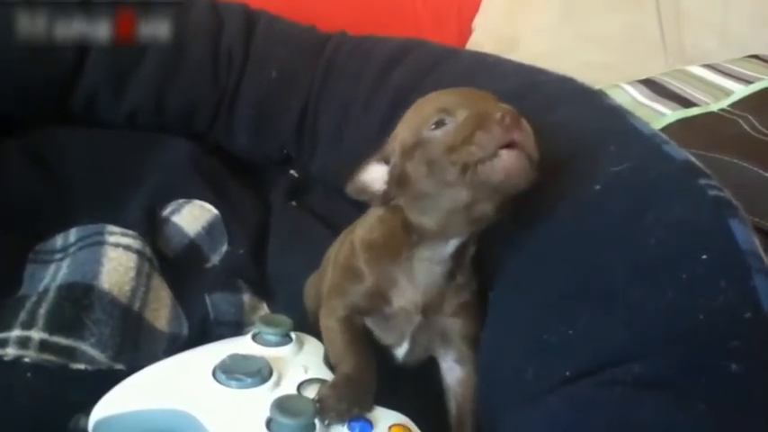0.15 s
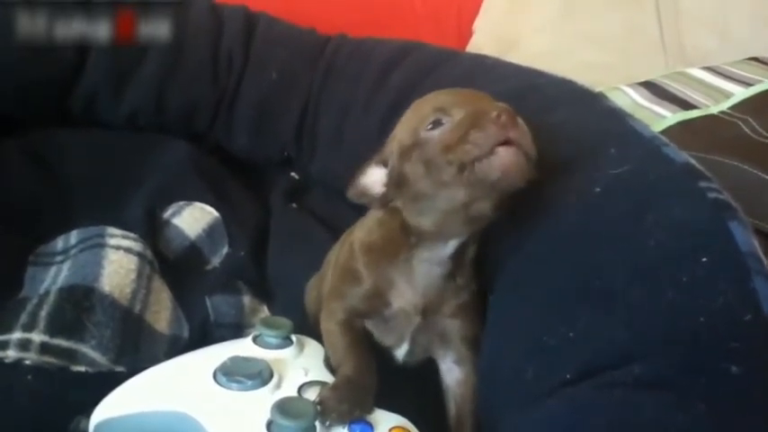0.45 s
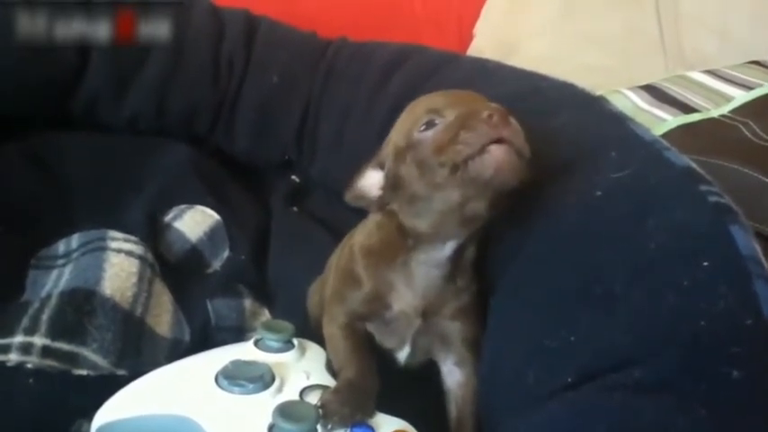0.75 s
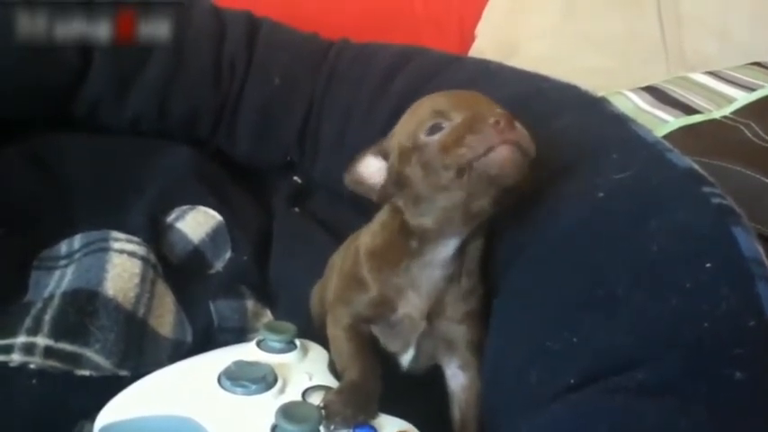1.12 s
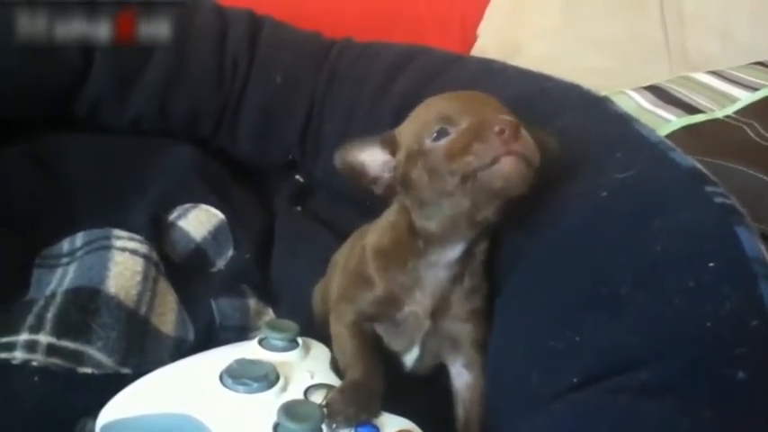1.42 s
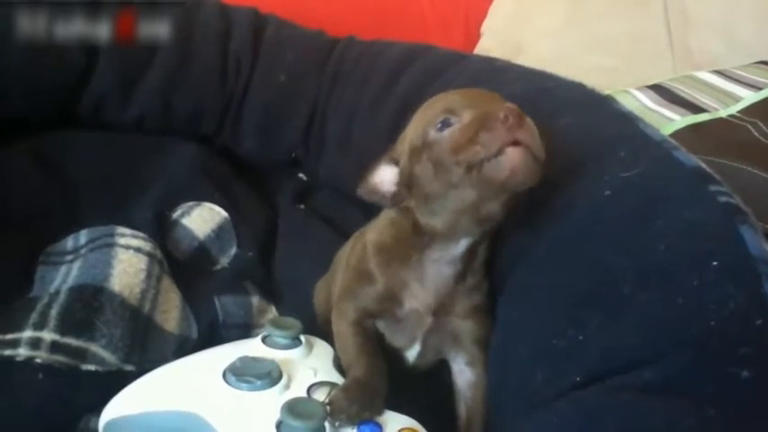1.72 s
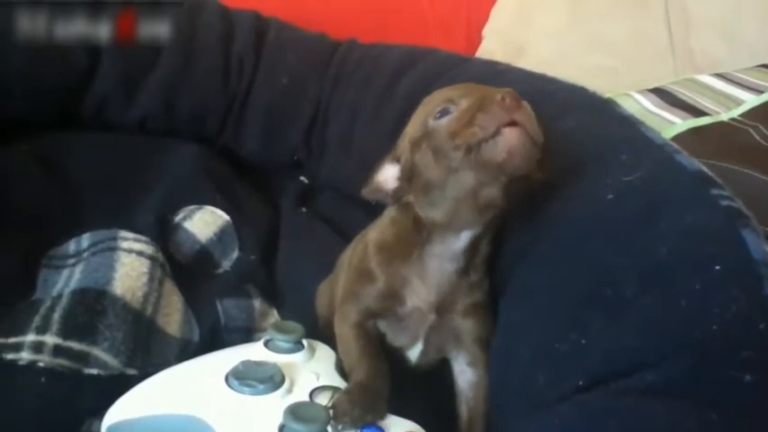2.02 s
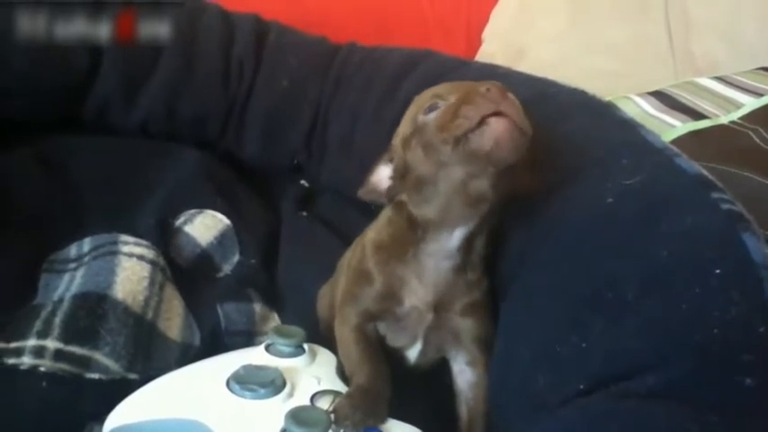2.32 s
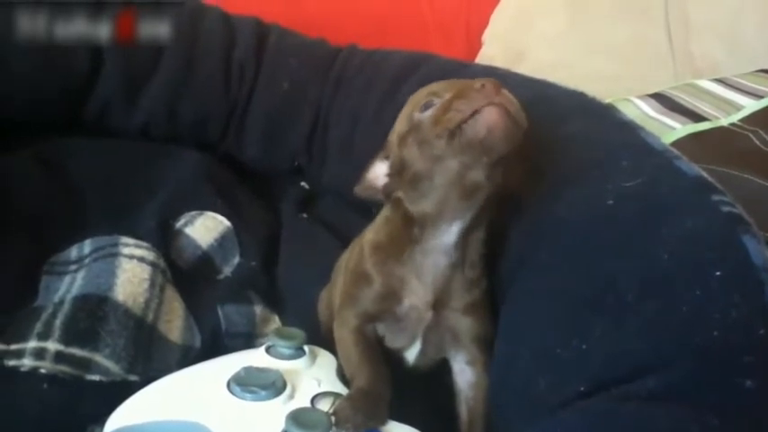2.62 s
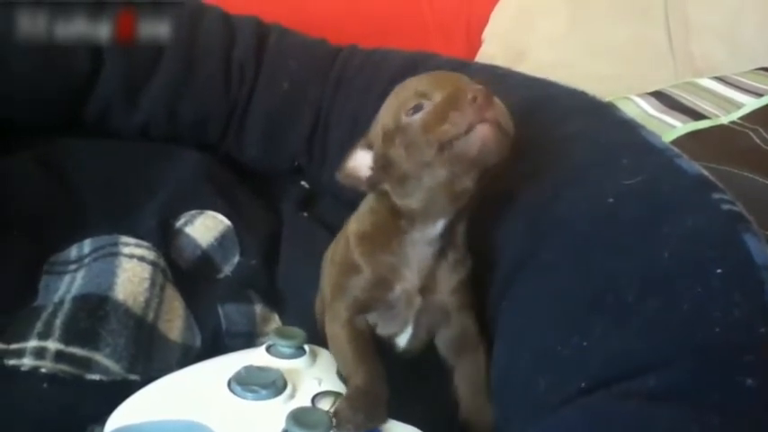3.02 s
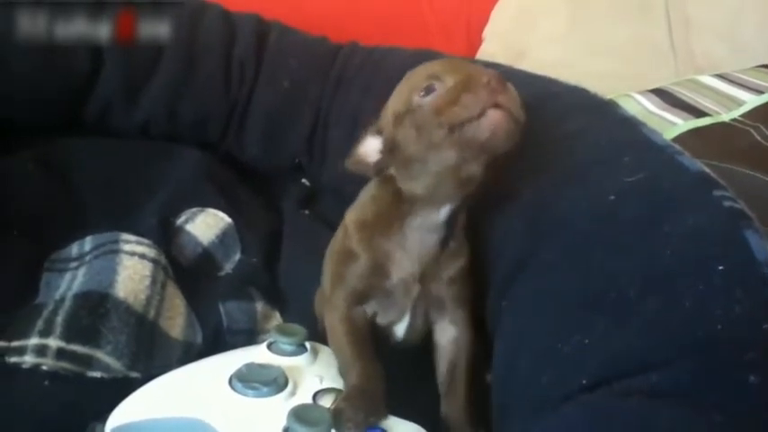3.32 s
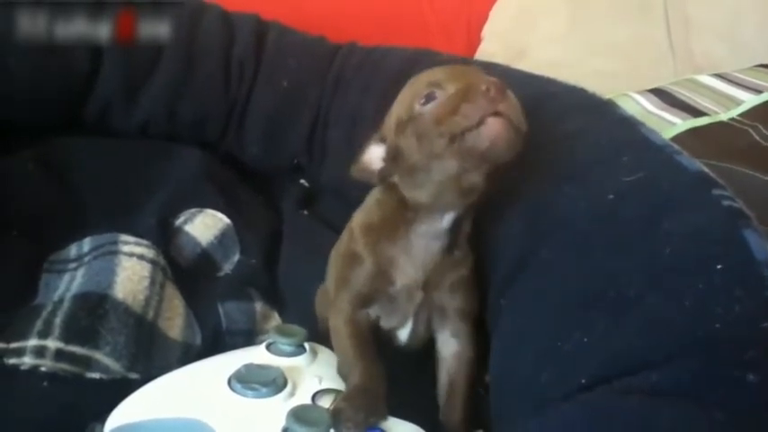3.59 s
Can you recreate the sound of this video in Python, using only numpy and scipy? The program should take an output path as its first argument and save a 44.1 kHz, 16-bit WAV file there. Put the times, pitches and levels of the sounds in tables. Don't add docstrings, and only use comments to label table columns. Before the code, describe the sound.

Puppy howling: cracked whimpers slide up into held clear tones, the last one cut off.

```python
import sys
import numpy as np
from scipy import signal
from scipy.fft import rfft, irfft
from scipy.io import wavfile
from scipy.ndimage import uniform_filter1d

SR = 44100
rng = np.random.default_rng(int(sys.argv[2]) if len(sys.argv) > 2 else 0)


def volts_from_decibels(level):
    exponent = np.asarray(level, float) / 20
    return 10 ** exponent


def unload_wav(signal):
    wavfile.write(
        sys.argv[1],
        SR,
        np.round(np.clip(np.atleast_2d(signal).T, -1, 1) * 32767).astype(np.int16),
    )


N = 165375

# f/Hz, level/dB
FLOOR_COLOUR = [(18, -60), (30, -25), (126, -5.5), (488, -13.5), (721, -18.5), (800, -14.5), (1750, -19.5),
                (2390, -24), (15200, -32)]
FLOOR_DB, FLOOR_SWAY_DB = -45, .5
DUCK_DB = 1
HUM_HZ, HUM_DB = 121, -56
ROOM_DB, ROOM_T60_S, ROOM_TOP_HZ = -24, .26, 2600

# t/s, level/dB, fade/dB per s
SCUFFS = [
    (2.995, -42, -41.5),
    (3.699, -41, 18),
    (3.4, -46, -350),
]
# f/Hz, level/dB
SCUFF_COLOURS = [
    [(200, -8), (900, -2), (2000, -6.5), (3500, -16), (6000, -24), (9000, -37)],
    [(60, -11.5), (150, -2), (300, -7), (600, -41), (2000, -69)],
    [(300, -15), (1500, 1), (6000, -3), (9000, -25.5)],
]

# t/s, length/s, level/dB, fade/dB, rate/pulses per s
CREAKS = [
    (0.957, 0.043, -22.5, -11, 380),
    (2.626, 0.031, -26, -18.5, 260),
    (3.2895, 0.0096, -23.5, -6.5, 410),
    (1.5, .004, -42, -9, 290),
]
# f/Hz, width/Hz, level/dB
CREAK_THROAT = [(800, 180, 6), (1199.4, 290, -4), (1880, 430, -11.5), (490, 190, -15)]
CREAK_HISS = 0.078

# f/Hz, level/dB
BREATH_COLOUR = [(300, -18.5), (1000, -4), (2200, -9), (3000, -29), (6500, -30.5), (8000, -11.5),
                 (12500, -12.5), (15000, -39.5)]
BREATH_DB, BREATH_SWAY_DB = -30.5, 1.2
GLIDE_BREATH_DB = 3

# t/s, length/s, cycles per pattern, in-between partials level/dB, raggedness 0-1
BREAKS = [
    (.006, 0.035, 2, -11, 0.09),
    (0.052, 0.018, 3, -13, 0.06),
    (1.639, .02, 2, -4, 0.07),
    (1.744, 0.026, 2, -7, 0.02),
    (1.76, .014, 3, -1.5, 0.1),
    (2.607, .035, 2, -13, 0.24),
    (3.285, 0.016, 3, 8, 0.15),
    (3.299, .028, 3, -1.5, 0.17),
]
# f/Hz, level/dB
BREAK_COLOUR = [(280, -17), (540, 0), (700, -0.5), (1200, 3), (2000, -4), (2600, -17.5), (3300, -39)]
JITTER_RAD, JITTER_HZ = .14, 350

# t/s, pitch f/Hz, effort level/dB, mouth lift of the fundamental/dB
WHIMPER_1 = [(0.008, 555, -25, 3.5), (0.037, 652, -19, 0), (0.058, 800, -24.5, 7), (0.1, 893, -18, 6),
             (0.129, 969, -19, 4), (0.161, 1008, -19.5, 9)]
WHIMPER_2 = [(1.648, 298.6, -48, 17.5), (1.66, 353, -39, 16.5), (1.688, 425.2, -28, 5.5),
             (1.728, 491, -26.5, 7.5), (1.752, 628, -17.5, -6), (1.764, 807.7, -25.5, 7),
             (1.782, 894.6, -20, 11), (1.82, 960.7, -20.5, 5.5)]
WHIMPER_3 = [(3.292, 773, -37.5, 4), (3.302, 813, -29, 6), (3.314, 879, -25, 11), (3.332, 946, -21.5, 9.5),
             (3.35, 1047, -24.5, 15), (3.362, 1068, -26.5, 14), (3.39, 941, -20, 8), (3.418, 947.4, -21, 5),
             (3.454, 1006, -18.5, 8.5)]
# t/s, pitch f/Hz, effort level/dB, mouth lift of the fundamental/dB
HOLD_1 = [(0.178, 1021, -18, 10), (0.194, 1027, -19.5, 5.5), (0.304, 1065, -17.5, 7.5),
          (0.354, 1047, -18, 6), (0.418, 1049, -17.5, 3.5), (0.474, 1019, -17.5, 6), (0.508, 1011, -18, 6),
          (0.56, 1007, -17.5, 9.5), (0.58, 992, -18.5, 8.5)]
HOLD_2 = [(1.846, 1000, -20.5, 11.5), (1.882, 1060, -19, 7.9), (1.916, 1085, -19, 10.3),
          (1.989, 1100, -18.5, 10.9), (2.076, 1081, -19.5, 9.8), (2.154, 1071, -16, 6.9),
          (2.19, 1060, -17.5, 6.5), (2.239, 1033, -17, 1.6), (2.284, 1033, -17, 1.9)]
HOLD_3 = [(3.51, 997.6, -17.5, 9.1), (3.548, 1021, -20, 11), (3.57, 1040, -20, 4), (3.586, 1034, -21, 9.3),
          (3.648, 1058, -20.5, 6.7), (3.662, 1053, -17.5, 6.8), (3.68, 1034, -21.5, 9.6),
          (3.704, 1038, -20.5, 5.9), (3.745, 1017, -20.5, 10.4)]
# t/s, pitch f/Hz, effort level/dB, mouth lift of the fundamental/dB
SAG_1 = [(0.618, 958, -19.5, 4.5), (0.64, 947, -20, 2.5), (0.7, 920.5, -18, 5), (0.726, 909, -19, 8.5),
         (0.756, 891.6, -18.5, 5), (0.8, 874.5, -18, 2.5), (0.855, 871, -18, 2.5), (0.918, 784.6, -18, 0),
         (0.953, 743, -18.5, -6)]
SAG_2 = [(2.34, 1009, -18, 6), (2.378, 1011, -16.5, 6), (2.44, 993.4, -18.5, 7.5), (2.46, 959, -19.5, 1),
         (2.51, 911, -18, 3.5), (2.554, 833, -17, -2), (2.586, 737.6, -16, -9), (2.607, 697, -21.5, -8),
         (2.626, 668.5, -28, -4)]
# t/s, slope/dB per octave of partial number, lower pocket lift/dB, upper pocket lift/dB
FOLDS_1 = [(0, -5, -25, -12), (.05, -3.5, -13, -15), (0.084, -3.5, 3.5, -1), (.3, -1.5, -23, 1.5),
           (.58, -3, -4, -8), (0.641, -4, 8, -14), (.73, -2.5, -2.5, -1), (.85, -2.5, -29, -3),
           (.91, -3.5, -15, 2), (.96, -9.5, -12, 0)]
FOLDS_2 = [(1.64, -5, -6, -10), (1.77, -4.5, -35, -3), (1.881, 0.5, 5, 3.5), (2.07, 0, 4, -1.5),
           (2.2, -3, 2.5, 0), (2.44, -4, -9.5, -0.5), (2.5, -4.5, 2, -8), (2.57, -5.5, -15, -6),
           (2.63, -17, -18, 1)]
FOLDS_3 = [(3.3, -3, -32, -14), (3.33, -2.5, -20, -10), (3.355, 4, 9, 8), (3.39, -1.5, -12, 5),
           (3.45, -1.5, -13, 1.5), (3.6, -0.5, 1.5, 2.5), (3.75, -1.5, -11, 2)]
# start t/s, stop t/s, rise/s, fall/s
VOICED = [
    (-.02, 0.958, .01, 0.0028),
    (1.638, 2.63, 0.0033, .008),
    (3.289, 3.8, 0.004, .01),
]
# f/Hz, level/dB
THROAT = [(1050, 10), (1400, -9), (2050, -6.5), (2600, -18.5), (4900, -27), (6200, -41), (8300, -21.5),
          (12500, -38.5)]
TOP_HZ, TOP_FALL_DB = 13300, -24.5
# f/Hz, width/Hz, level/dB
POCKETS = [(3726, 92, 11.5), (4191, 97, 6)]
WANDER, WANDER_HZ, SHIMMER_DB, SHIMMER_HZ = 0.00324, 31.8, 1.5, 25.6
LAG_LOW_RAD, LAG_HIGH_RAD = .5, 1.05
SHUT_HZ, OPEN_HZ = 600, 847
MUFFLE_HZ, MUFFLE_DB = 2450, -5
FUZZ, FUZZ_PER_GLIDE, FUZZ_HZ, LOW_FUZZ = .2, .4, 240, .12


def evened(x):
    return x / np.sqrt(np.mean(x ** 2) + 1e-20)


def read(points, hz):
    f, value = np.transpose(points)
    return np.interp(np.log(hz + 1), np.log(f + 1), value)


def coloured(points):
    spectrum = rfft(rng.standard_normal(N))
    return evened(irfft(spectrum * volts_from_decibels(read(points, np.fft.rfftfreq(N, 1 / SR))), N))


def slow(top_hz, count=1):
    coarse = N // 64
    hz = np.fft.rfftfreq(coarse, 64 / SR)
    spectrum = np.fft.rfft(rng.standard_normal((count, coarse)))
    drifts = np.fft.irfft(spectrum / (1 + (hz / top_hz) ** 4) / np.sqrt(hz + 3), coarse)
    return np.array([np.interp(np.arange(N) / 64, np.arange(len(v)), evened(v - v.mean())) for v in drifts])


def ring(x, hz, width):
    return signal.lfilter(*signal.iirpeak(hz, hz / width, SR), x)


def room_hiss(pup):
    loud = uniform_filter1d(pup ** 2, size=800) > volts_from_decibels(-50)
    busy = uniform_filter1d(1. * loud, size=1500)
    return volts_from_decibels(FLOOR_DB + DUCK_DB * busy + FLOOR_SWAY_DB * slow(3.8)[0]) * coloured(FLOOR_COLOUR)


def room_hum():
    return volts_from_decibels(HUM_DB) * evened(ring(rng.standard_normal(N), HUM_HZ, 1.9))


def reflections(x):
    taps = np.zeros(SR // 2)
    at = np.arange(200, len(taps) - 22, 22)
    taps[at + rng.integers(0, 22, len(at))] = rng.choice([-1., 1.], len(at))
    decay = volts_from_decibels(-60 * np.arange(len(taps)) / SR / ROOM_T60_S)
    taps = signal.lfilter(*signal.butter(2, ROOM_TOP_HZ, fs=SR), taps * decay)
    return volts_from_decibels(ROOM_DB) * signal.fftconvolve(x, taps / np.linalg.norm(taps))[:N]


def paw_on_cloth():
    t, out = np.arange(N) / SR, np.zeros(N)
    for (start, level_db, fade_db), colour in zip(SCUFFS, SCUFF_COLOURS):
        onset = np.clip((t - start) / 0.012, 0, 1)
        grain_db = 1.9 * slow(60)[0]
        out += onset * volts_from_decibels(level_db + fade_db * np.maximum(t - start, 0) + grain_db) * coloured(colour)
    return out


def creaks():
    t, out = np.arange(N) / SR, np.zeros(N)
    jitter, size = slow(150)[0], rng.uniform(0.25, 1, N)
    for start, length, level_db, fade_db, rate in CREAKS:
        on = (t >= start) & (t < start + length)
        turns = np.floor(np.cumsum(on * rate * np.exp(.35 * jitter)) / SR + .999)
        pulses = np.diff(turns, prepend=0) * size + CREAK_HISS * on * rng.standard_normal(N)
        pulses = pulses * volts_from_decibels(fade_db * (t - start) / length * on)
        for k, (f, width, db) in enumerate(CREAK_THROAT):
            rung = ring(ring(pulses, f, 1.2 * width), f, 1.2 * width)
            out += volts_from_decibels(level_db + 38.5) * (-1) ** k * volts_from_decibels(db) * rung
    return out


def breath(turn, glide, sway):
    level_db = BREATH_DB + GLIDE_BREATH_DB * np.minimum(glide, 2) + BREATH_SWAY_DB * sway
    return volts_from_decibels(level_db) * coloured(BREATH_COLOUR) * (1 + .5 * np.cos(turn))


def cracked(low, turn, hz):
    t, low = np.arange(N) / SR, low.copy()
    ragged = ring(rng.standard_normal(N), 240, 360)
    ragged = evened(ring(ring(ragged, 360, 500), 360, 500))
    for start, length, cycles, between_db, rag in BREAKS:
        on, c = (t > start) & (t < start + length), round(cycles)
        between = 0
        for m in range(1, 5 * c):
            if m % c:
                between = between + volts_from_decibels(read(BREAK_COLOUR, m / c * hz[on])) * np.cos(m / c * turn[on] + m * m)
        swell = np.sqrt(np.sin(np.pi * (t[on] - start) / length))
        rough = rag * ragged[on]
        low[on] += swell * (rough * low[on] + volts_from_decibels(between_db) * between * (1 + rough))
    return low


def low_partials(turn, hz, lift_db, shimmer):
    quick = shimmer[1] - uniform_filter1d(shimmer[1], size=3500)
    lag = np.interp(hz, [500, 1100], [LAG_LOW_RAD, LAG_HIGH_RAD])
    return volts_from_decibels(lift_db + 1.23 * quick) * np.cos(turn) + volts_from_decibels(0.46 * shimmer[2]) * np.cos(2 * turn - lag)


def high_partials(turn, hz, glide, folds, shimmer):
    sharp_db, pocket_db, upper_db = folds
    fuzz = FUZZ + FUZZ_PER_GLIDE * np.minimum(glide, 2)
    flutter, steady = slow(FUZZ_HZ, count=6) * fuzz, 1 / np.sqrt(1 + 2 * fuzz ** 2)
    muffle_db = MUFFLE_DB * np.clip((OPEN_HZ - hz) / (OPEN_HZ - SHUT_HZ), 0, 1)
    (f1, w1, db1), (f2, w2, db2) = POCKETS
    high, step = np.zeros(N), np.exp(1j * (turn - .5))
    swing = step ** 2
    for k in range(3, 20):
        f, swing = k * hz, swing * step
        pockets = 1 - 1j * volts_from_decibels(db1 + pocket_db) / (1 + 1j * (f - f1) / w1)
        pockets = pockets - 1j * volts_from_decibels(db2 + upper_db) / (1 + 1j * (f - f2) / w2)
        db = read(THROAT, f) + TOP_FALL_DB * np.maximum(f - TOP_HZ, 0) / 1000 + sharp_db * np.log2(k / 2)
        db = db + muffle_db * np.clip((f - MUFFLE_HZ) / 1000, 0, 2)
        wobble = flutter[k % 6] + 1j * flutter[(k + 3) % 6]
        fluttered = steady * (1 + wobble) if k > 5 else 1 + LOW_FUZZ / fuzz * wobble
        high += volts_from_decibels(db + SHIMMER_DB * shimmer[k]) * (pockets * swing * fluttered).real
    return high


def howls():
    t = np.arange(N) / SR
    rows = np.array(WHIMPER_1 + HOLD_1 + SAG_1 + WHIMPER_2 + HOLD_2 + SAG_2 + WHIMPER_3 + HOLD_3)
    rows = rows[np.argsort(rows[:, 0])]
    hz, effort_db, lift_db = (uniform_filter1d(np.interp(t, rows[:, 0], rows[:, c]), size=200)
                              for c in range(1, 4))
    at, *settings = np.transpose(FOLDS_1 + FOLDS_2 + FOLDS_3)
    folds = [np.interp(t, at, v) for v in settings]
    gate, rough = np.zeros(N), np.zeros(N)
    for start, stop, rise, fall in VOICED:
        gate += np.clip((t - start) / rise, 0, 1) * np.clip((stop - t) / fall, 0, 1)
    for start, length, *_ in BREAKS:
        rough += np.sqrt(np.sin(np.pi * np.clip((t - start) / length, 0, 1)).clip(0))
    glide = uniform_filter1d(np.maximum(np.gradient(np.log2(hz)), 0) * SR, size=1500)
    hz = hz * (1 + WANDER * slow(WANDER_HZ)[0])
    turn = 2 * np.pi * np.cumsum(hz) / SR + JITTER_RAD * rough * slow(JITTER_HZ)[0]
    shimmer = slow(SHIMMER_HZ, count=20)
    low = cracked(low_partials(turn, hz, lift_db, shimmer), turn, hz)
    high = high_partials(turn, hz, glide, folds, shimmer)
    return gate * volts_from_decibels(effort_db) * (np.sqrt(2) * (low + high) + breath(turn, glide, shimmer[0]))


def scene():
    pup = howls() + creaks()
    return (room_hiss(pup) + room_hum() + reflections(pup) + paw_on_cloth() + pup)[None]


def top_cut(x):
    return signal.sosfilt(signal.butter(12, 15360, fs=SR, output="sos"), x)


def record(dry):
    mix = signal.lfilter(*signal.butter(1, 18, "high", fs=SR), dry[0])[None]
    return top_cut(mix)


dry = scene()
out = record(dry)
unload_wav(out)
```